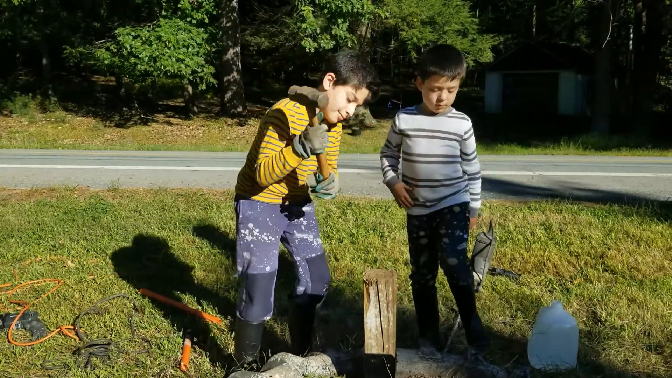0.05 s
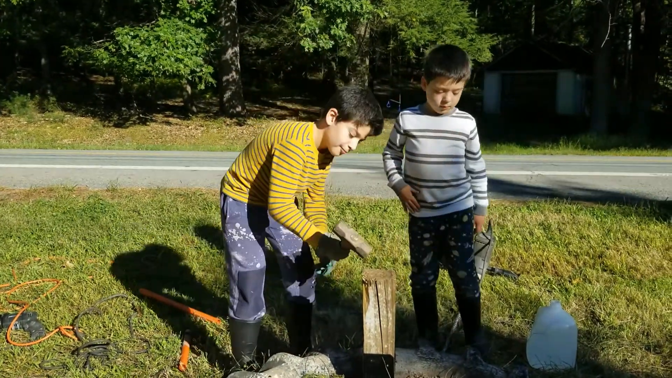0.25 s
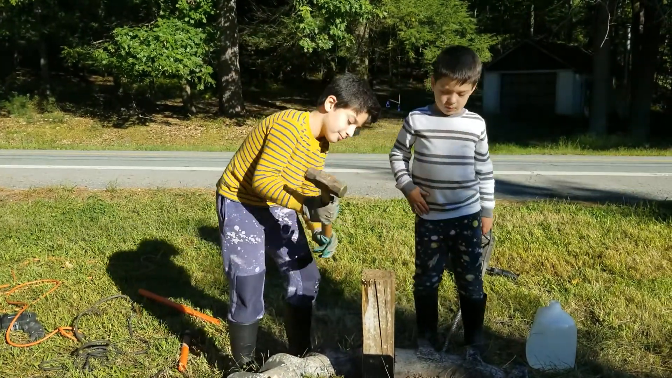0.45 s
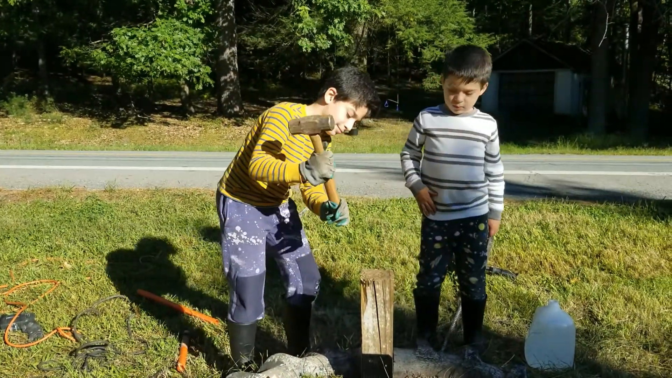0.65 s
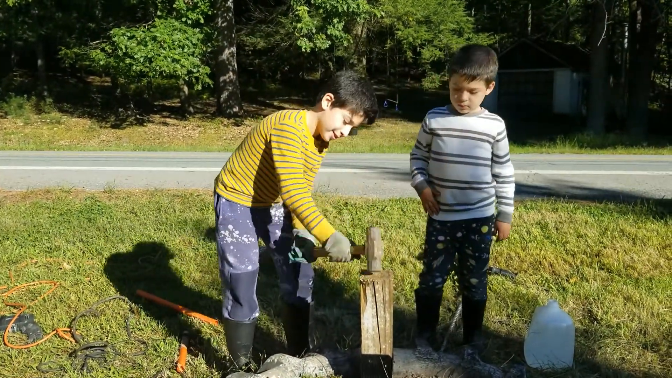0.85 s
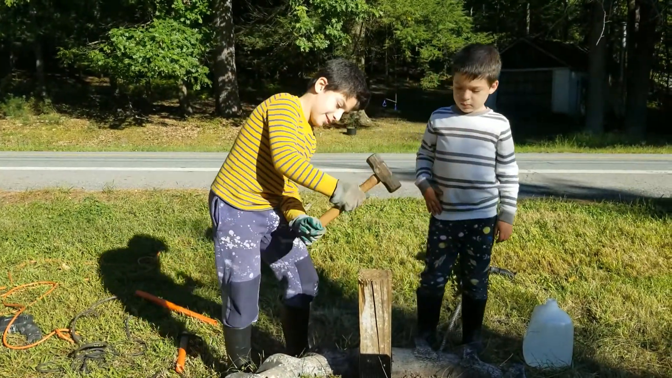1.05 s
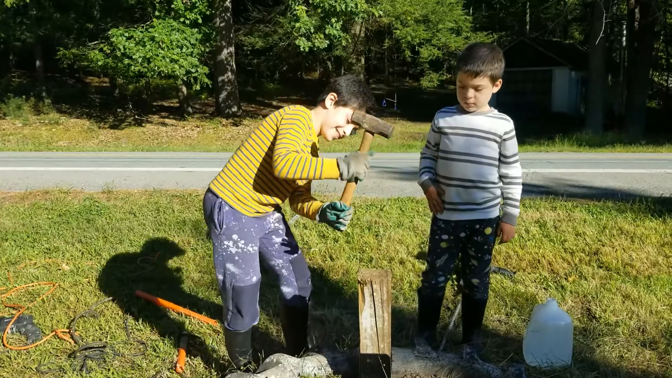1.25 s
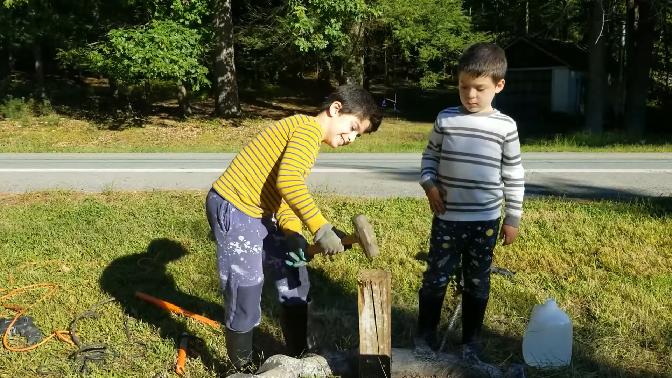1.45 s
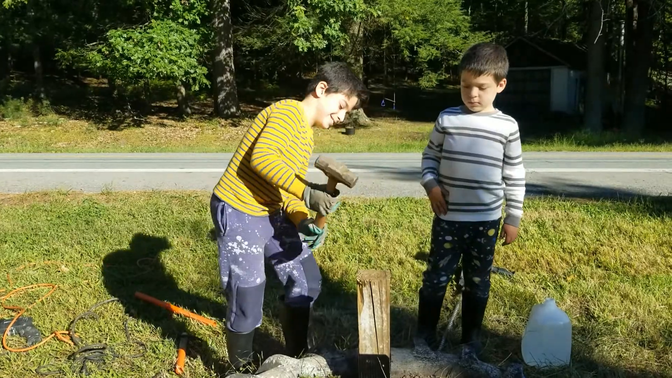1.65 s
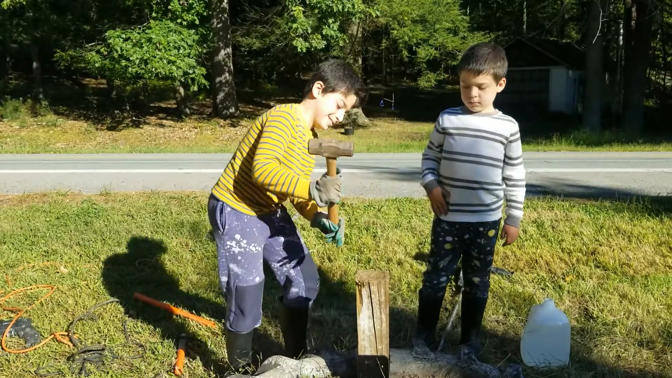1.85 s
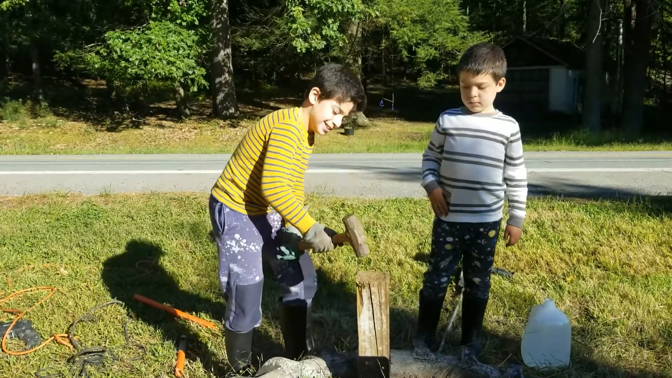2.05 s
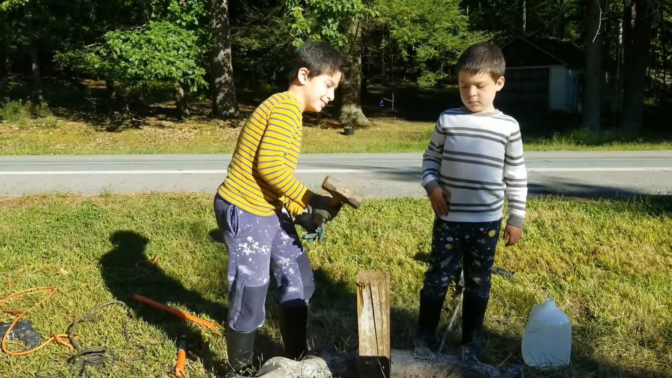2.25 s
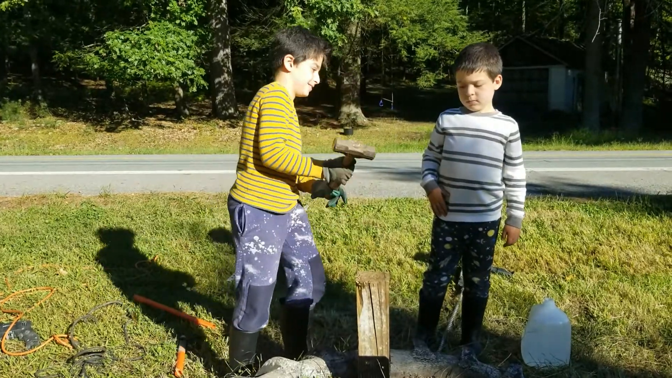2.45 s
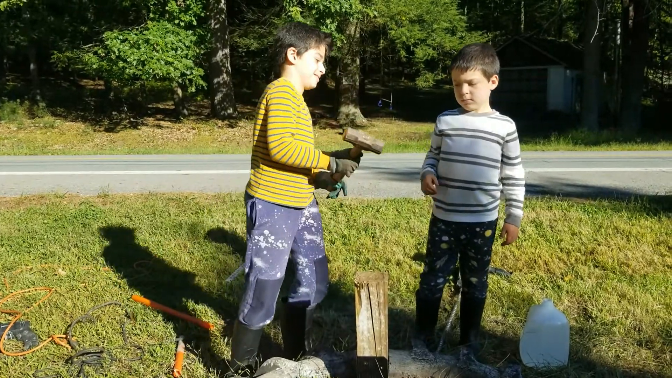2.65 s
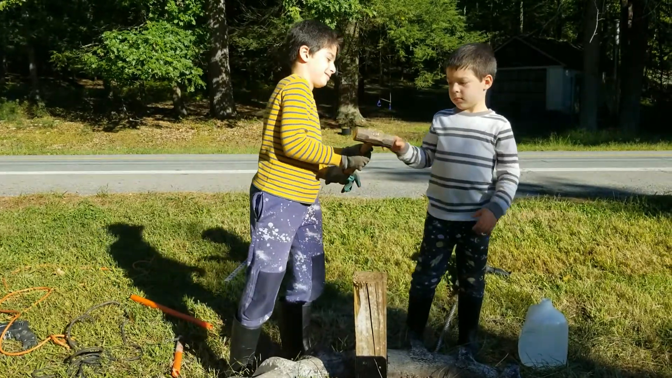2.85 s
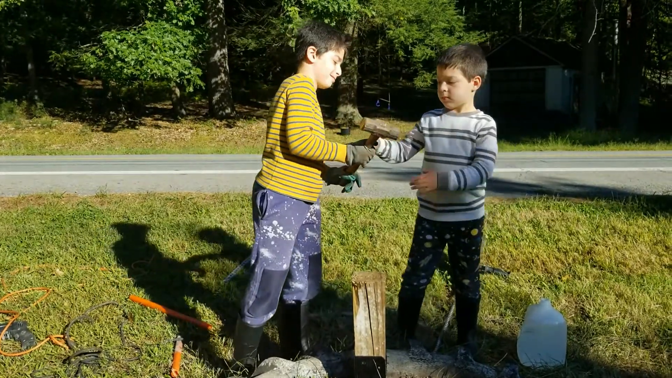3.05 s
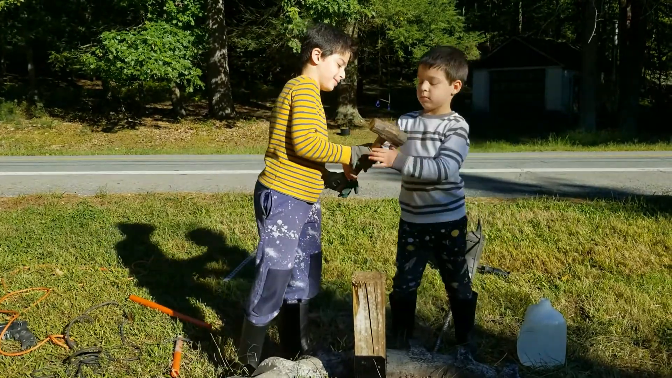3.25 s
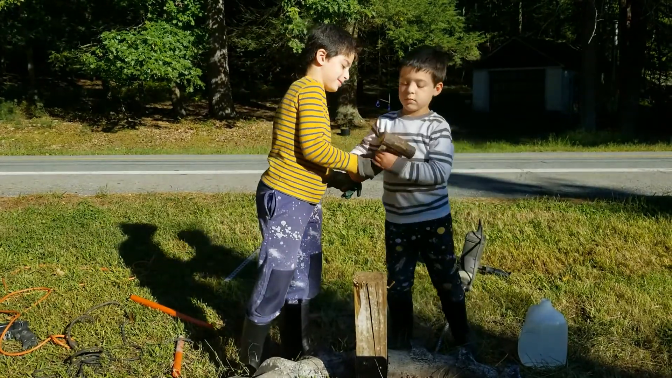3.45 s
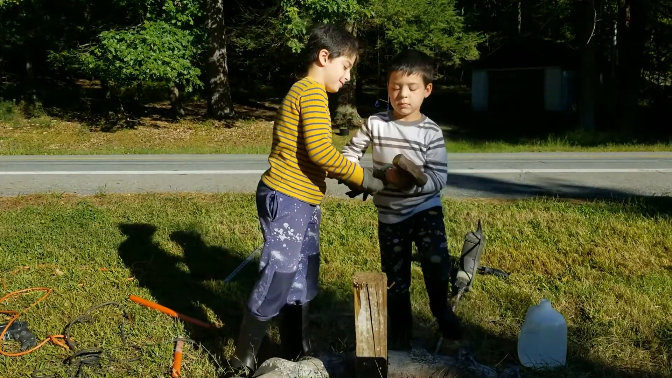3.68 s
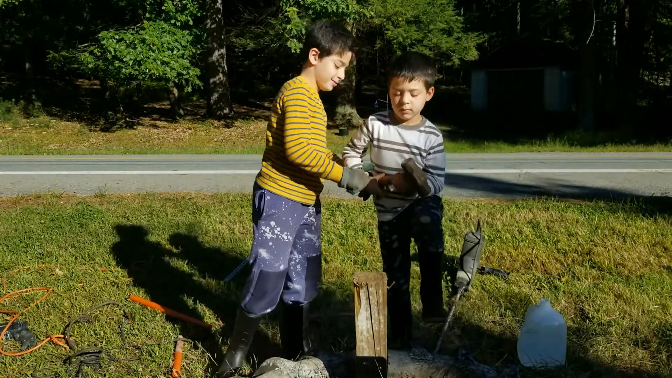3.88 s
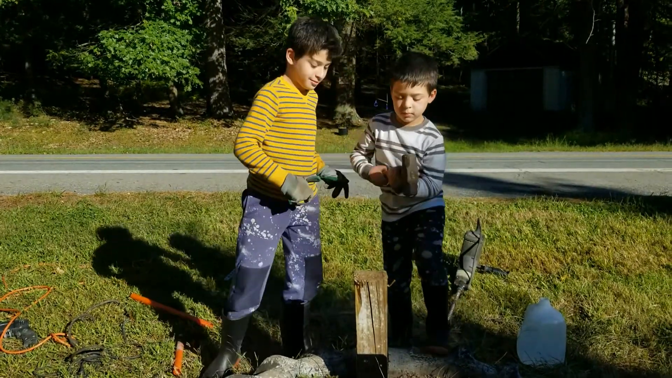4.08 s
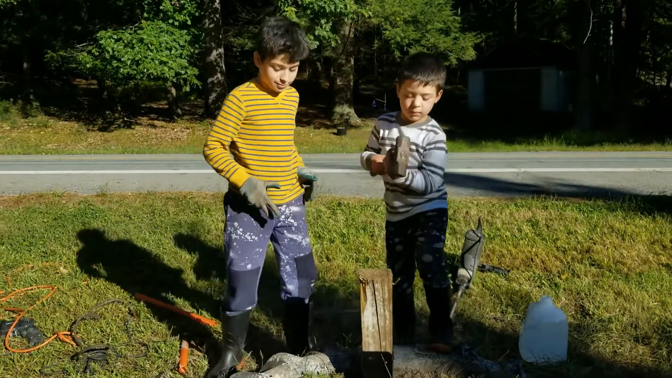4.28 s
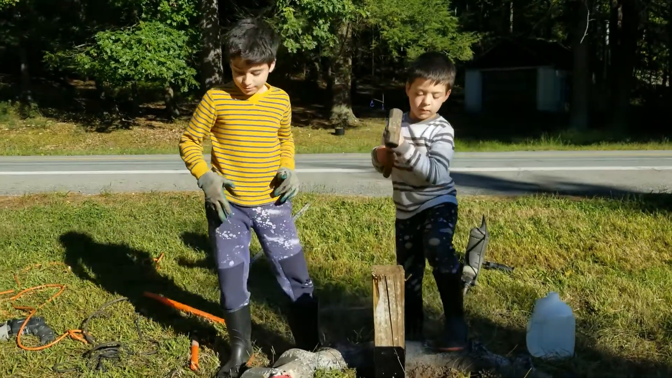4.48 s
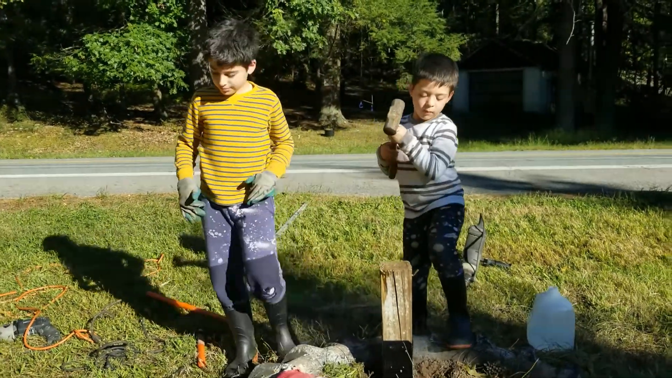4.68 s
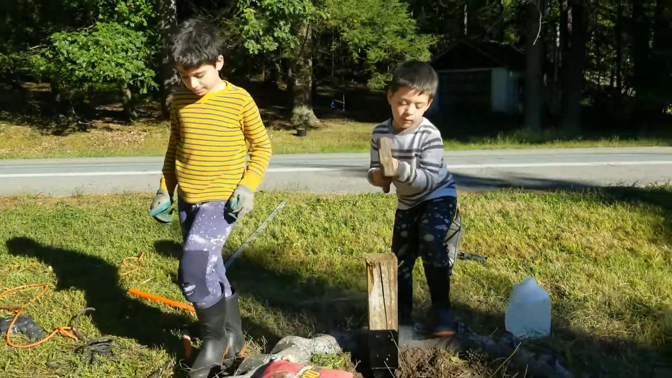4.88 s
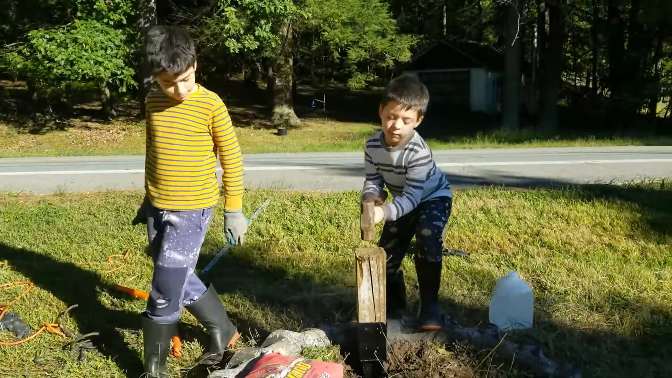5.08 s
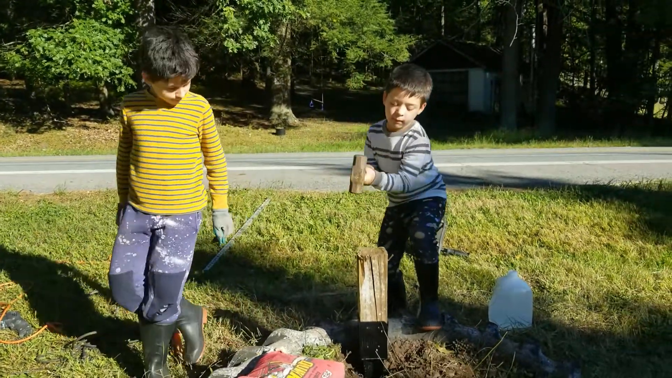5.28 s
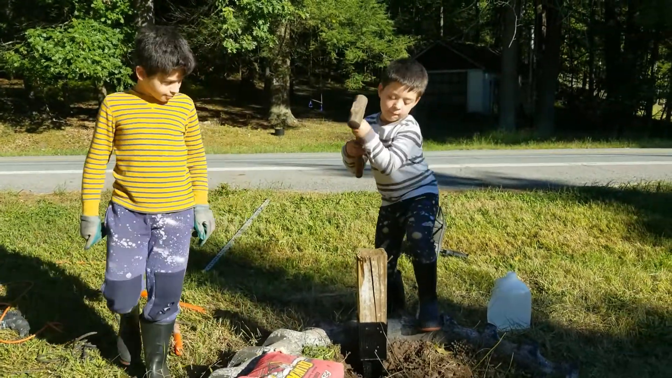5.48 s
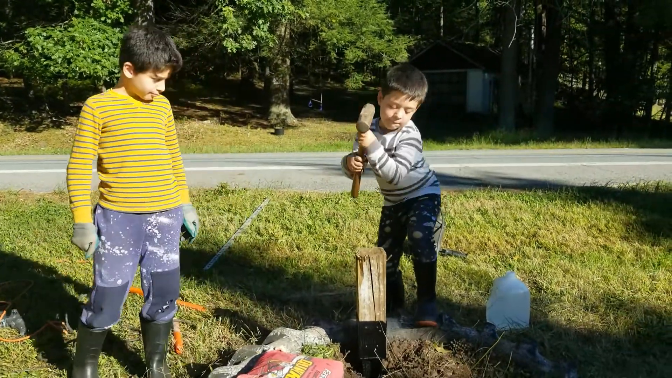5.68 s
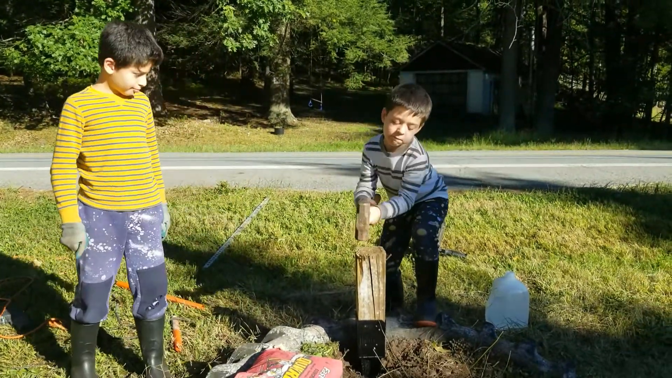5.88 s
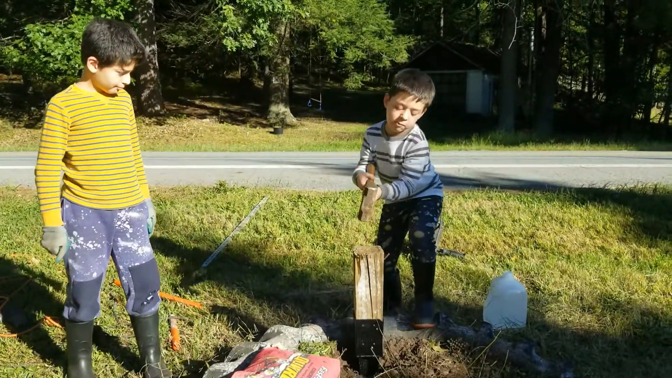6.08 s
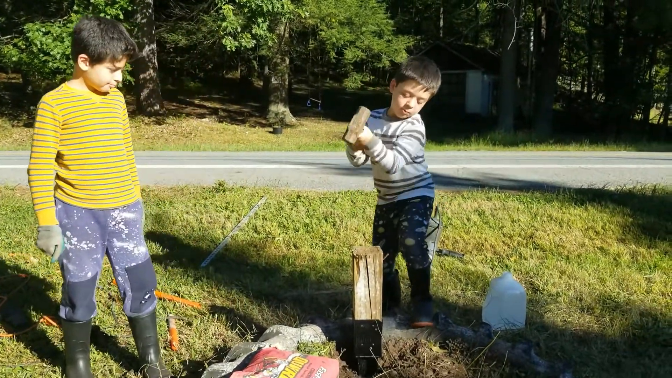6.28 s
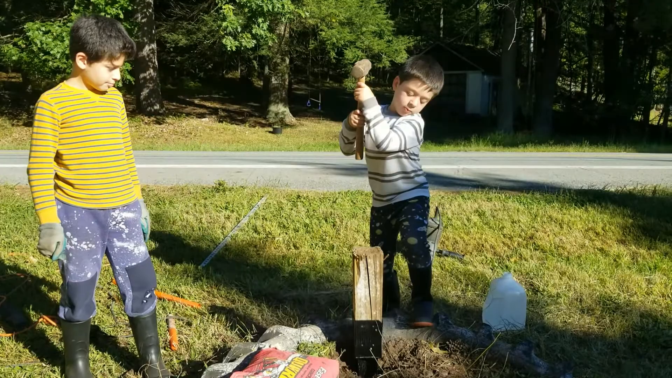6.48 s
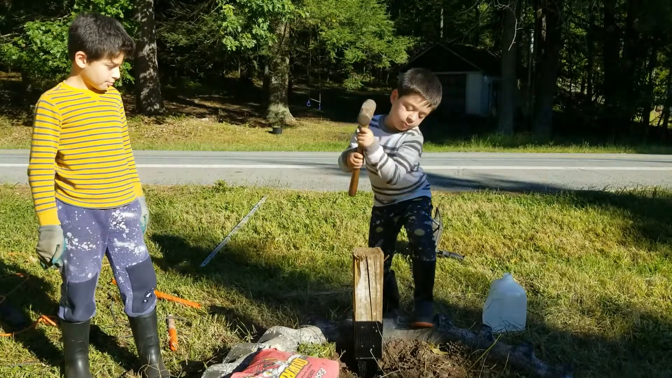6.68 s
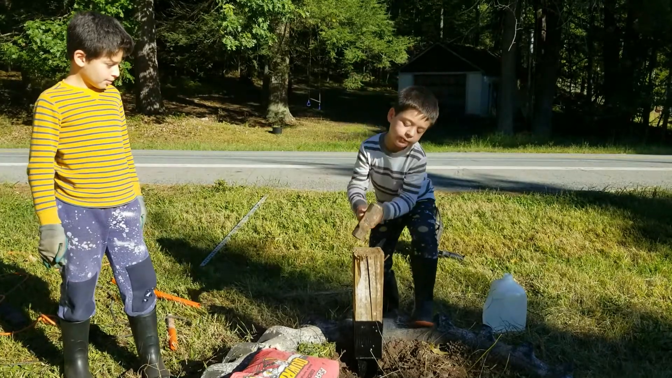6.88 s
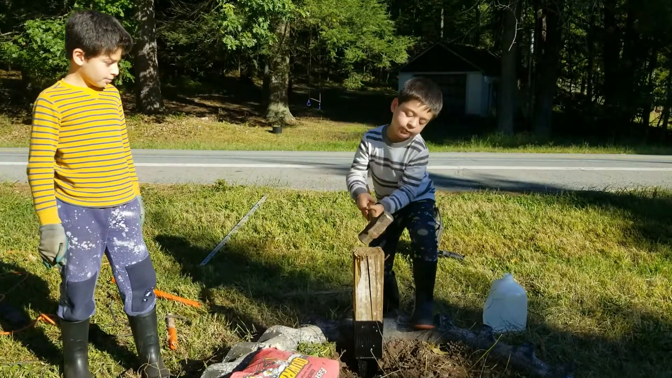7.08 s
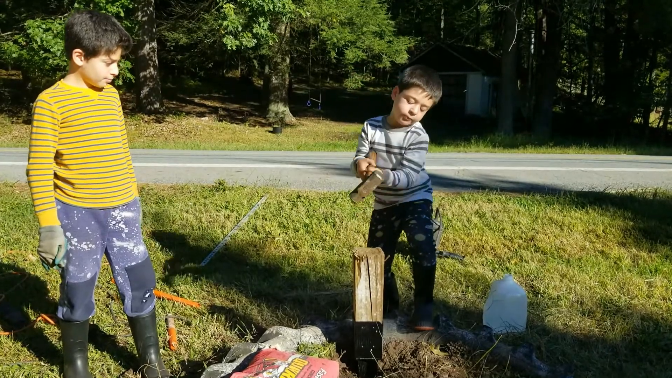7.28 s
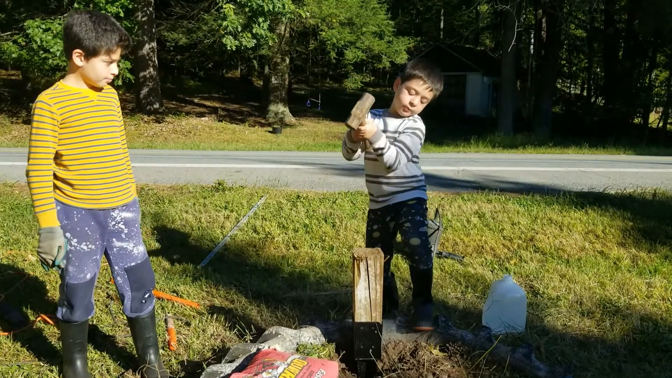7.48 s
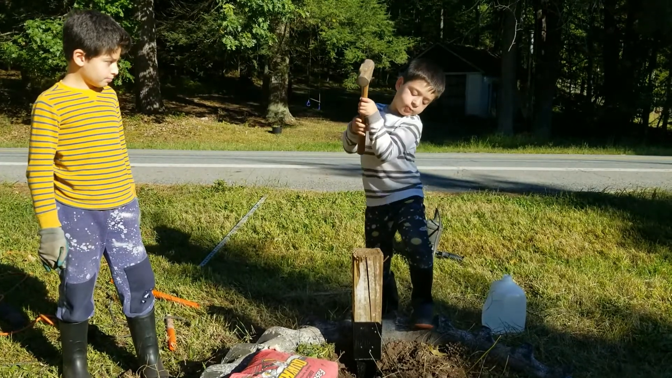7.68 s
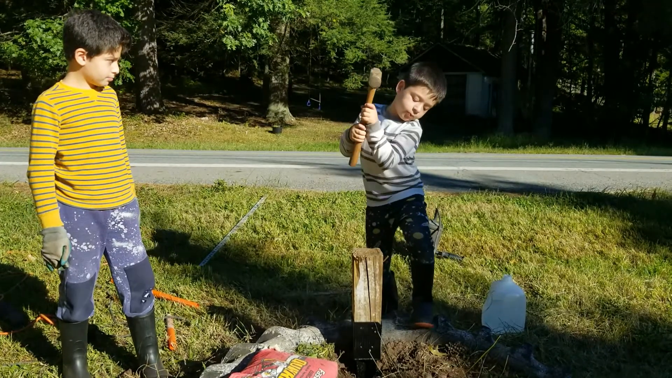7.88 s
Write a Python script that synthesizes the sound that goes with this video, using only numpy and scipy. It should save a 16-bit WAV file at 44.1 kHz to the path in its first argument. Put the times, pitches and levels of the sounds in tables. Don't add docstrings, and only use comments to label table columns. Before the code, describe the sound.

Open air beside a road and woods, with very faint high cricket chirps, insect shimmer and soft microphone hiss. A heavy hammer hits a wooden post at 0.2 s with a sharp, thin crack, then at 0.85 s with the heaviest thud, at 1.4 s with the strongest woody ring, and at 2.0 s with full thud and ring. Each is loud, dry and very short, followed by a quick ragged echo from the trees. From 3 to 4.9 s there are faint cloth and grass rustles, a dull knock near 4.0 s and another near 4.85 s. Low wind buffeting swells from 4.3 to 5.1 s. Blows resume at 5.0 s, 5.8 s, duller with a bright bite, and 6.8 s, a hard thud, with a light contact at 7.05 s. An insect buzzes faintly around 7.2 s. Distant tyre hiss rises from 4 s and is strongest at the end, near 7.9 s.

```python
import sys
import numpy as np
from scipy import signal
from scipy.fft import rfft, irfft, next_fast_len
from scipy.io import wavfile
from scipy.ndimage import uniform_filter1d, minimum_filter1d

SR = 44100
rng = np.random.default_rng(int(sys.argv[2]) if len(sys.argv) > 2 else 0)


def gain_from_db(level_db):
    decades = np.asarray(level_db, float) / 20
    return 10 ** decades


def inscribe(sig):
    pcm = np.round(np.clip(np.atleast_2d(sig).T, -1, 1) * 32767)
    wavfile.write(sys.argv[1], SR, pcm.astype(np.int16))


N = 350154

# start_s, thud_db, ring_db, crack_db, bite_db (added to the crack above 7 kHz)
BLOWS = [
    (0.2046, -15.5, -20, -2.5, 2.5),
    (.845, 3, -7.5, -12, 3),
    (1.4004, -5.5, 0.5, -10.5, -1.5),
    (1.9795, -1.5, -2, -12.5, -4.5),
    (4.9924, -6, -5, -10.5, -1),
    (5.835, -6.5, -5.5, -17.5, 9),
    (6.8212, -1.5, -12, -14, -2.5),
]
# knock_db, echo_brightness_db
LANDING = [
    (-15, 10),
    (-12, -3),
    (-11, -2.5),
    (-11, -1.5),
    (-12, -0.1),
    (-11.5, -2.5),
    (-6.5, 2.5),
]
# pitch_hz, level_db (per Hz)
CLOTH_COLOUR = [(1290, -36), (2200, -5.5), (2450, 3), (2760, -9.5), (4020, -4), (4450, -5.5), (6810, -3.5),
                (11100, -11), (13800, -4.5), (15900, -21.5), (16300, -37)]


def rms_one(x):
    return x / np.sqrt(np.mean(x ** 2) + 1e-20)


def in_time(rows):
    s, db = np.transpose(rows)
    return np.interp(np.arange(N) / SR, s, db)


def at_hz(points, hz, column=1):
    points = np.array(points)
    return np.interp(np.log(hz), np.log(points[:, 0]), points[:, column])


def coloured(spectrum, size=N):
    padded = next_fast_len(size)
    hz = np.maximum(np.arange(padded // 2 + 1) * SR / padded, 1)
    (low_hz, low_db), (high_hz, high_db) = spectrum[0], spectrum[-1]
    closed = [(low_hz / 2, low_db - 40), *spectrum, (high_hz * 4, high_db - 80)]
    white = rfft(rng.standard_normal(padded))
    return rms_one(irfft(white * gain_from_db(at_hz(closed, hz)), padded)[:size])


def drift(rate_hz):
    r = np.exp(-80 * np.pi * rate_hz / SR)
    slow = signal.lfilter([1], [1, -2 * r, r * r], rng.standard_normal(N // 40 + 2002))[2000:]
    return np.interp(np.arange(N) / 40, np.arange(len(slow)), rms_one(slow))


def add(track, s, sound):
    at = round(s * SR)
    track[at:at + len(sound)] += sound[:N - at]


def dying(t, rise_s, t60_s):
    return (1 - np.exp(-t / rise_s)) * gain_from_db(-60 * t / t60_s)


def fibre_crack(t, bite_db):
    # pitch_hz, level_db (per Hz)
    crack_colour = [(1180, -28), (2000, -3), (4070, -3), (5110, -0.5), (6480, -7.5), (9530, -7),
                    (11000, -25.5), (13400, -13), (15700, -26.5), (16300, -32.5)]
    bitten = [(hz, level_db + bite_db * (hz > 7000)) for hz, level_db in crack_colour]
    burst = dying(t, 0.00098, 0.011) * dying(t, 0.00098, 0.071)
    late = gain_from_db(-24) * dying(t, .003, 0.034)
    return coloured(bitten, size=len(t)) * (burst + late)


def end_grain_crush(t):
    # pitch_hz, level_db (per Hz)
    crush_colour = [(180, -8), (400, 0.5), (800, -3), (1500, -3.5), (2600, -12.5)]
    return coloured(crush_colour, size=len(t)) * dying(t, .0015, .022)


def post_ring(t, family_db):
    # pitch_hz, level_db, t60_s, family (0 ground, 1 thud, 2 ring, 3 knock, 4 side ring, 5 steel head)
    post_modes = [(68, -3.5, 0.13, 0), (118, 0.5, .095, 0), (173, -2.5, 0.075, 0), (352, -4, 0.026, 4),
                  (420, -2, 0.03, 1), (496, 2, 0.036, 4), (703, -11, 0.026, 4), (950, -8.5, 0.043, 4),
                  (1112, 2.4, 0.034, 1.5), (1209, -6, 0.045, 4), (1488, -2.5, .03, 3), (1770, -3, 0.031, 3),
                  (1980, -2.5, 0.03, 3), (2230, -5, 0.029, 3), (826, -10, .025, 4), (5090, -4.5, .014, 5),
                  (8400, -11, .01, 5)]
    out = np.zeros(len(t))
    chance = rng.standard_normal((len(post_modes), 3))
    for (hz, level_db, t60, family), (tune, gain_db, phase) in zip(post_modes, chance):
        family = int(round(family))
        turns = hz * (1 + 0.009 * tune) * t
        swing = -np.sin(2 * np.pi * turns + 0.38 * family * phase)
        out += gain_from_db(level_db + family_db[family] + gain_db - 1) * swing * dying(t, 0.002, t60)
    return out


def blows():
    out, t = np.zeros(N), np.arange(8192) / SR
    ground_db = -20
    for (s, thud_db, ring_db, crack_db, bite_db), (knock_db, _) in zip(BLOWS, LANDING):
        side_db = (thud_db + ring_db) / 2
        family_db = [ground_db, thud_db, ring_db, knock_db, side_db, crack_db]
        add(out, s + .0004, gain_from_db(crack_db + 7.5) * fibre_crack(t, bite_db))
        add(out, s + .001, gain_from_db(knock_db + 5.5) * end_grain_crush(t))
        add(out, s + .0013, post_ring(t, family_db))
    return out


def wood_edge():
    # pitch_hz, level_db, t60_s
    wood_decay = [(120, -63, 0.4), (200, -70, 0.55), (300, -69, 0.49), (480, -59, 1), (750, -64, 1),
                  (1120, -55.5, 1), (1600, -60, 1), (2500, -62.5, 0.72), (5027, -64, 0.74),
                  (7850, -59.5, 0.5), (14000, -73.5, .33)]
    near_db, near_s = 15, .024
    trees_db, trees_s, trees_rise_s = 5, 0.069, .015
    low_follows = 0.32
    out, t = np.zeros(N), np.arange(SR) / SR
    edges_hz = 85 * 2 ** np.arange(0, 8, .5)
    shape_db = near_db * np.exp(-t / near_s) + trees_db * np.clip((t - trees_s) / trees_rise_s, 0, 1)
    white = rng.standard_normal((2, N))
    for k, (low, high) in enumerate(zip(edges_hz, edges_hz[1:])):
        hz, level = np.sqrt(low * high), np.zeros(N)
        tail = gain_from_db(at_hz(wood_decay, hz) + shape_db - 60 * t / at_hz(wood_decay, hz, column=2))
        for (s, _, ring_db, *_), (_, high_db) in zip(BLOWS, LANDING):
            low_db = low_follows * (ring_db + 4)
            add(level, s + .004, gain_from_db(at_hz([(800, low_db), (2500, high_db)], hz)) * tail)
        band = signal.sosfilt(signal.butter(2, [low, high], "band", fs=SR, output="sos"), white[k % 2])
        out += level * gain_from_db(2.8 * drift(39)) * rms_one(band)
    return out


def taps():
    # start_s, peak_db, body_hz, t60_s, tick_db
    small_contacts = [(0.2326, -15, 8640, 0.0089, -25), (.457, -47, 8340, .03, -32),
                      (1.063, -64, 4000, .01, -3.5), (3.068, -75, 9000, .01, 3.5),
                      (3.814, -68, 2800, 0.04, -3), (3.974, -27.5, 420, 0.045, -49),
                      (3.996, -36.5, 300, 0.079, -31), (4.545, -58, 906, .02, -9),
                      (4.847, -25, 360, 0.081, -35), (5.6, -64, 1500, .02, 8),
                      (5.693, -45, 2500, 0.055, -13), (7.05, -32, 503, 0.097, -30),
                      (7.053, -31, 1600, 0.045, -19.5)]
    out, t = np.zeros(N), np.arange(4096) / SR
    for s, peak_db, hz, t60, tick_db in small_contacts:
        tone = np.sin(2 * np.pi * hz * t) * dying(t, .001, min(t60, .015))
        dull = coloured([(hz / 5, 3), (hz, -.5), (hz * 3, -14)], size=len(t)) * dying(t, 0.0006, t60)
        tick = gain_from_db(tick_db) * coloured(CLOTH_COLOUR, size=len(t)) * dying(t, 0.00047, 0.023)
        add(out, s, gain_from_db(peak_db) * (tone + .5 * dull + tick))
    return out


def rustle():
    # start_s, length_s, swelling_share (of the length), swish_db, scuff_db
    movements = [(.425, .05, .6, -74.5, -90), (3.02, 0.32, .35, -88, -90), (3.4, .36, .6, -84, -91),
                 (3.721, .18, 0.49, -92, -96.5), (3.96, .62, 0.08, -84.5, -78.5),
                 (4.518, 0.25, 0.17, -81, -81), (4.62, 0.67, 0.58, -77, -77.5), (4.884, 0.21, .5, -76, -69),
                 (5.14, 0.4, .42, -81, -86.5), (5.571, .16, 0.58, -64.5, -68), (5.67, 0.2, .3, -83, -81),
                 (7.035, 0.16, .3, -84, -75.5)]
    # pitch_hz, level_db (per Hz)
    swish_colour = [(10500, -13.5), (12200, -2.5), (13600, 0), (15000, -5), (16000, -10)]
    swish, scuff = np.zeros((2, N))
    for s, length, swelling, swish_db, scuff_db in movements:
        place = np.interp(np.arange(length * SR) / (length * SR), [0, swelling, 1], [0, .5, 1])
        add(swish, s, gain_from_db(swish_db) * np.sin(np.pi * place) ** 2.3)
        add(scuff, s, gain_from_db(scuff_db) * np.sin(np.pi * place) ** 2.4)
    dull = signal.sosfilt(signal.butter(4, 10500, fs=SR, output="sos"), coloured(CLOTH_COLOUR))
    thin = gain_from_db(-0.5) * swish * coloured(swish_colour)
    broad = gain_from_db(7.5) * scuff * rms_one(dull)
    return gain_from_db(2.0 * drift(91)) * (thin + broad)


def wind():
    # time_s, level_db
    gust_level = [(0, -52), (.3, -65.5), (.8, -68.5), (1.15, -85.5), (1.6, -70), (2.3, -72), (2.95, -86),
                  (3.5, -75), (4.2, -74), (4.6, -37), (5.0, -29.5), (5.15, -43), (5.45, -60.5), (5.98, -48),
                  (6.3, -70), (6.75, -52), (7.25, -72.5), (7.94, -71.5)]
    # pitch_hz, level_db (per Hz)
    gust_colour = [(8.8, -33), (15, -14.5), (46, 2), (76, -1), (105, -7.5), (188, -31.5), (280, -33),
                   (400, -45), (520, -73), (880, -120)]
    # time_s, level_db
    eddy_hits = [(0.387, -60), (.499, -61.5), (.738, -64), (1.871, -65), (2.34, -64), (2.614, -64.5),
                 (3.312, -48), (3.707, -69), (3.986, -57), (4.28, -48), (4.385, -41.5), (4.465, -37.5),
                 (4.53, -32.5), (4.624, -31.5), (4.709, -27.5), (4.859, -30), (5.263, -40), (5.562, -50),
                 (5.727, -50), (5.792, -43), (6.186, -51.5), (6.485, -58.5), (6.59, -52.5), (6.775, -42),
                 (6.954, -46.5), (7.064, -49), (7.403, -58), (7.523, -59.5), (7.583, -60.5)]
    eddy_s = 0.014
    noise = coloured(gust_colour)
    noise /= np.sqrt(uniform_filter1d(noise ** 2, size=4000) + 0.17)
    level = gain_from_db(in_time(gust_level) + 2.9 * drift(15))
    t = np.arange(-2048, 2048) / SR
    for s, db in eddy_hits:
        add(level, s + t[0], gain_from_db(db) * np.exp(-.5 * (t / eddy_s) ** 2))
    return level * noise


def road():
    # time_s, tyre_hiss_db
    approach = [
        (0, -69),
        (.7, -69.5),
        (1.9, -63),
        (2.6, -64.5),
        (4.0, -60),
        (4.75, -52),
        (5.15, -56),
        (5.8, -54),
        (6.6, -54),
        (7.94, -51.5),
    ]
    # pitch_hz, level_db (per Hz)
    tyre_colour = [(210, -54.5), (350, -27), (585, -8), (712, -9), (768, -3.5), (1180, -5), (1390, -5.5),
                   (1600, -5.5), (2050, -20.5), (2700, -41), (3510, -74.5), (5940, -120)]
    # pitch_hz, level_db (per Hz)
    tread_colour = [(1700, -7.5), (2100, 1), (2700, -11), (3300, -13), (4000, -20)]
    # pitch_hz, level_db (per Hz)
    drone_colour = [(60, -9), (110, -1.5), (180, 0), (300, 2), (500, -4.5), (800, -22)]
    hiss_db = in_time(approach)
    tread = gain_from_db(1.5 * (hiss_db + 51.5) - 13.5) * coloured(tread_colour)
    tyres = gain_from_db(hiss_db + .8 * drift(5.3)) * (coloured(tyre_colour) + tread)
    drone_db = -61 + 1.2 * (hiss_db + 53)
    return tyres + gain_from_db(drone_db + 0.6 * drift(8)) * coloured(drone_colour)


def cricket(pace, start, hz, fall_hz, length, level_db):
    since_s, rate = np.transpose(pace)
    rate_now = rate[np.searchsorted(since_s, np.arange(N) / SR, "right") - 1]
    count = start + np.cumsum(rate_now) / SR
    place = ((count + 0.59) % 1 - .5) / length
    pitch_hz = hz - fall_hz * np.clip(place + .5, 0, 1) ** 3
    stroke = np.cos(np.pi * np.clip(place, -.5, .5))
    rough_db = 1.2 * drift(5) + 3 * drift(300)
    return gain_from_db(level_db + rough_db) * stroke * np.sin(2 * np.pi * np.cumsum(pitch_hz) / SR)


def crickets():
    # from_s, chirps_per_s
    near_pace = [(0, 15.99), (1.8, 15.73), (3.1, 16.007), (4.5, 16.57), (5.4, 16.05)]
    # from_s, chirps_per_s
    far_pace = [(0, 17.07), (1.8, 16.956), (4.5, 16.8), (6.4, 17.39)]
    near = cricket(near_pace, start=-.21, hz=8750, fall_hz=900, length=.4, level_db=-75)
    far = cricket(far_pace, start=.02, hz=7230, fall_hz=800, length=.46, level_db=-84)
    return near + far


def insect_chorus():
    # pitch_hz, width_hz, level_db
    voices = [(3400, 280, -90), (4937, 760, -78.5), (7040, 540, -94), (8600, 560, -88), (8170, 420, -82.5)]
    swell_db, swell_period_s = 2.5, 5.1
    flare_s, flare_db, flare_length_s = 3.16, 13, .1
    out, t = np.zeros(N), np.arange(N) / SR
    swelling_db = swell_db * np.cos(2 * np.pi * t / swell_period_s)
    flaring_db = flare_db * np.exp(-((t - flare_s) / flare_length_s) ** 2)
    for hz, width, level_db in voices:
        band = signal.butter(2, [hz - width / 2, hz + width / 2], "band", fs=SR, output="sos")
        voice = rms_one(signal.sosfilt(band, rng.standard_normal(N)))
        out += gain_from_db(level_db + swelling_db + flaring_db * (hz < 4000) + drift(4)) * voice
    return out


def passing_buzz():
    start_s, length_s, level_db, rise_s, t60_s = 7.225, .3, -64, .02, 0.94
    floor_hz, opens_hz, opens_s = 8300, 1550, 0.028
    out, t = np.zeros(N), np.arange(length_s * SR) / SR
    edge_hz = opens_hz * (1 - np.exp(-(t / opens_s) ** 2))
    wobble, rough = drift(58.4), drift(120)
    level = gain_from_db(level_db - 16) * dying(t, rise_s, t60_s) * np.sqrt(1 - t / length_s)
    for k, place in enumerate(rng.random(16)):
        own = slice(k * len(t), (k + 1) * len(t))
        pitch_hz = floor_hz + place * edge_hz + 60 * wobble[own]
        add(out, start_s, level * gain_from_db(7.0 * rough[own]) * np.sin(2 * np.pi * np.cumsum(pitch_hz) / SR))
    return out


def microphone_hiss():
    # pitch_hz, level_db (per Hz)
    hiss_colour = [(20, -21.5), (300, -11.5), (2500, 2.5), (6000, -5), (9500, -1.5), (11000, -6.5),
                   (16000, -5)]
    return gain_from_db(-88.5) * coloured(hiss_colour)


def scene():
    work = blows() + wood_edge() + taps() + rustle()
    insects = crickets() + insect_chorus() + passing_buzz()
    return (work + wind() + road() + insects + microphone_hiss())[None]


def band_limit(x):
    return signal.sosfilt(signal.butter(12, 16430, fs=SR, output="sos"), x)


def record(dry):
    heard = signal.sosfilt(signal.butter(2, 28, "high", fs=SR, output="sos"), dry)
    release_db = 900 * np.arange(N) / SR
    over_db = np.maximum(20 * np.log10(np.abs(heard[0]) + 1e-9) + 0.11, 0)
    held_db = np.maximum.accumulate(over_db + release_db) - release_db
    ahead_db = uniform_filter1d(-minimum_filter1d(-held_db, size=41), size=41)
    limited = heard * gain_from_db(-ahead_db)
    cut = signal.sosfilt(signal.cheby2(10, 60, 16650, fs=SR, output="sos"), limited)
    return band_limit(np.clip(cut, -1, 1))


dry = scene()
out = record(dry)
inscribe(out)
```